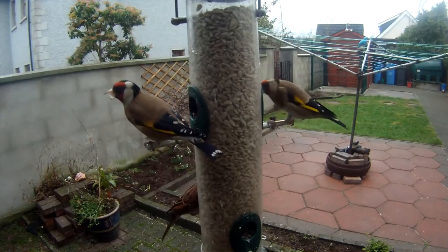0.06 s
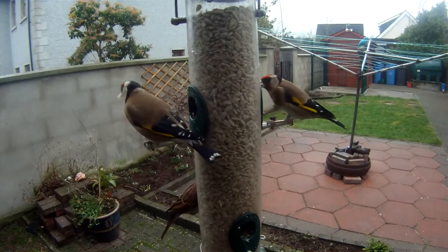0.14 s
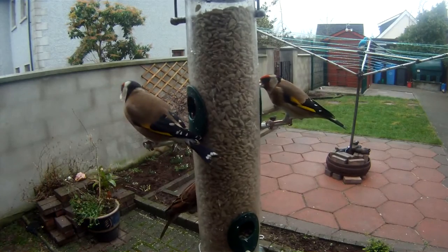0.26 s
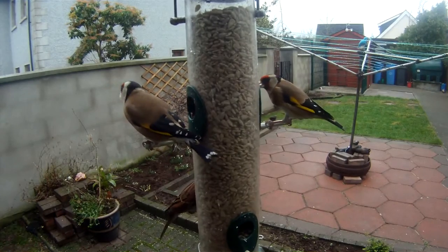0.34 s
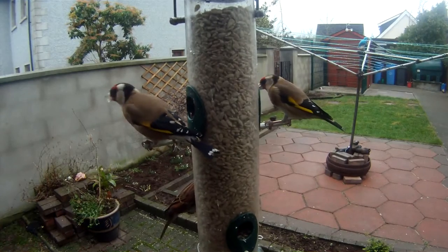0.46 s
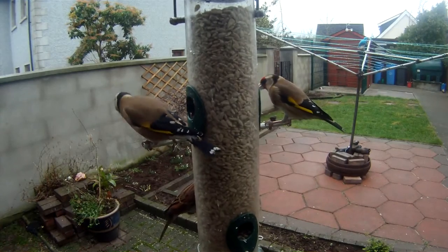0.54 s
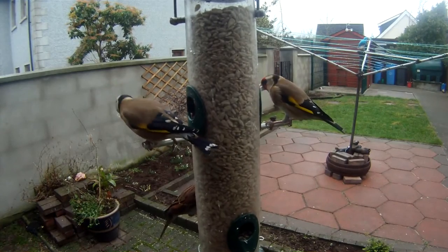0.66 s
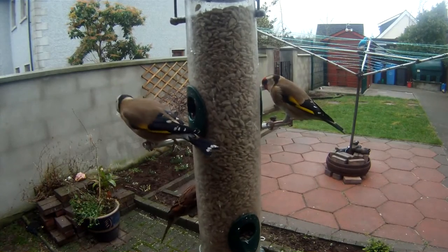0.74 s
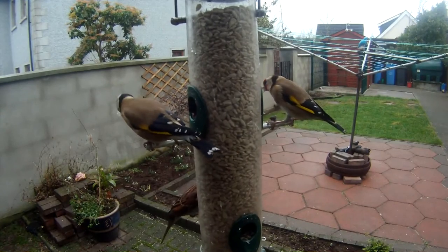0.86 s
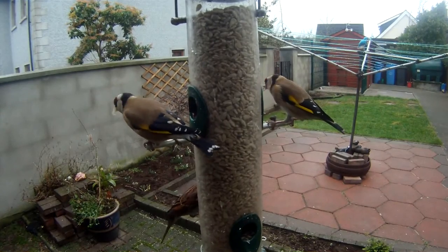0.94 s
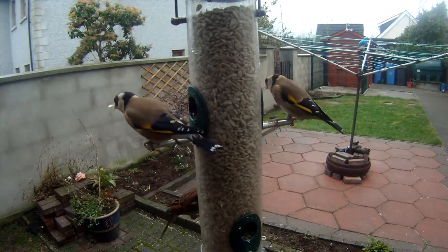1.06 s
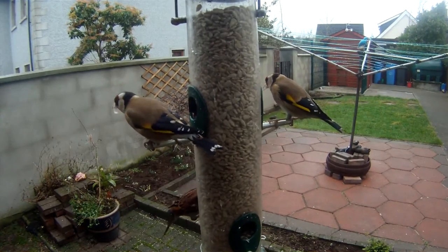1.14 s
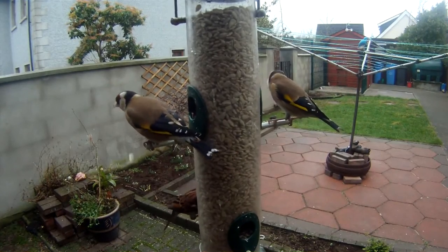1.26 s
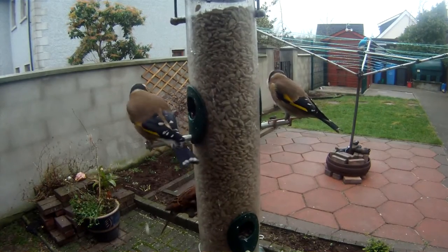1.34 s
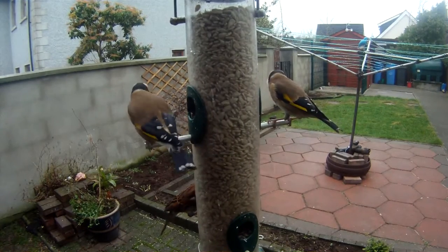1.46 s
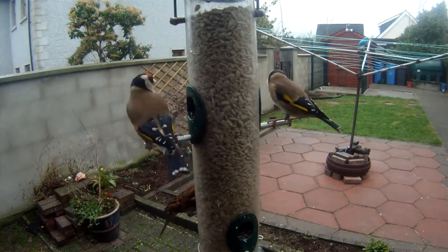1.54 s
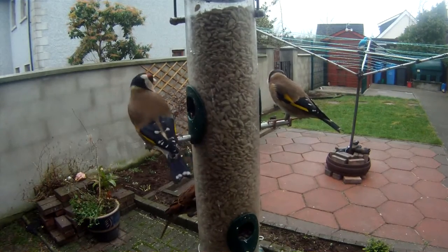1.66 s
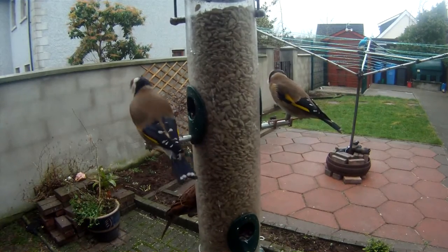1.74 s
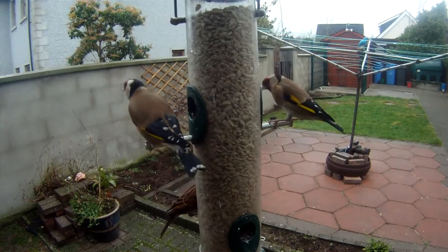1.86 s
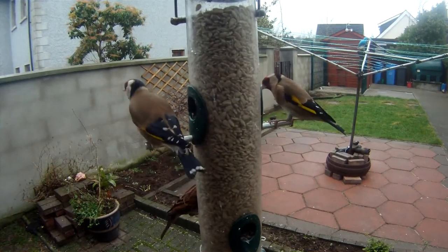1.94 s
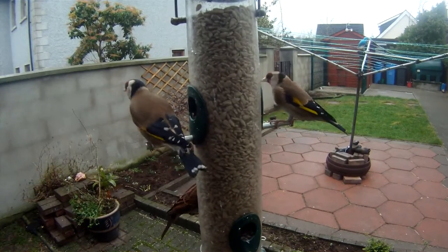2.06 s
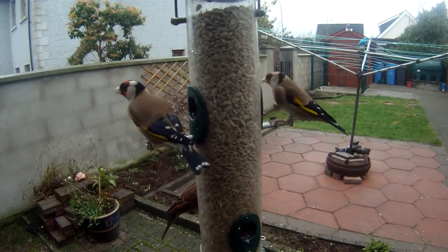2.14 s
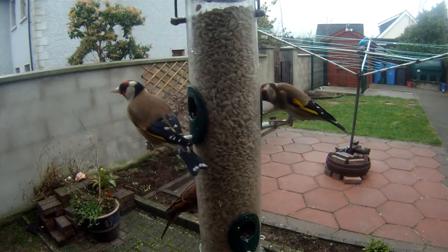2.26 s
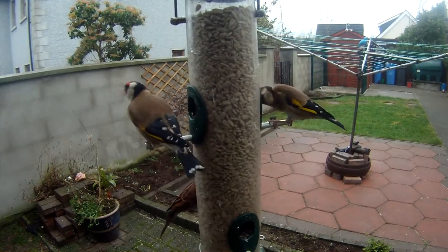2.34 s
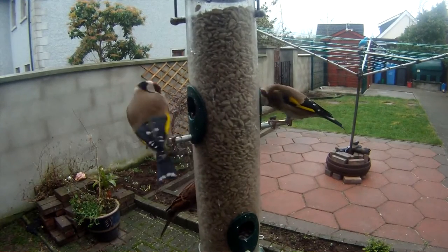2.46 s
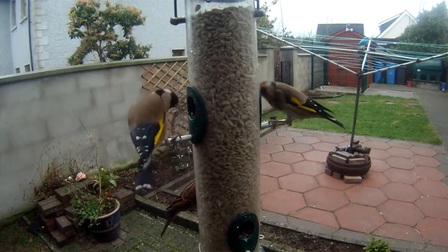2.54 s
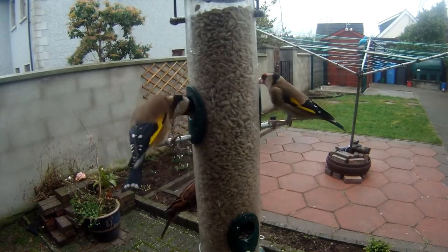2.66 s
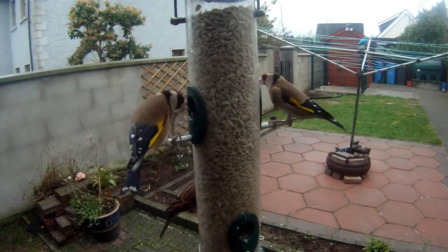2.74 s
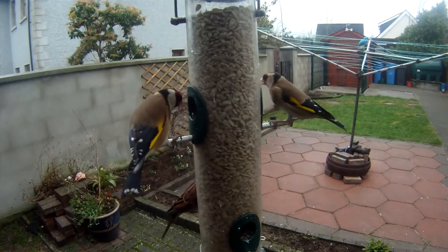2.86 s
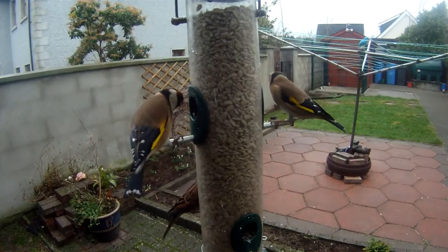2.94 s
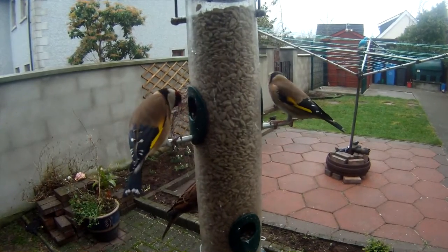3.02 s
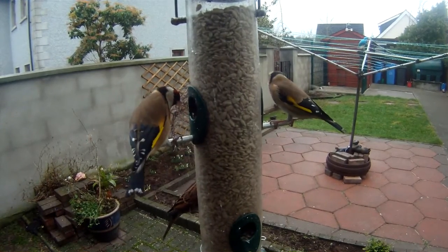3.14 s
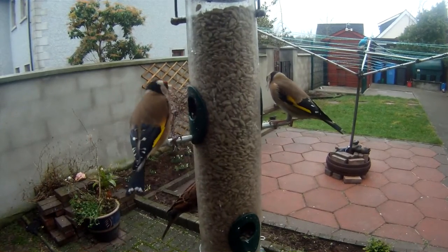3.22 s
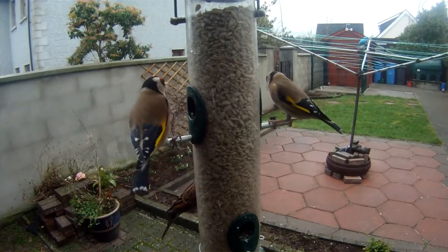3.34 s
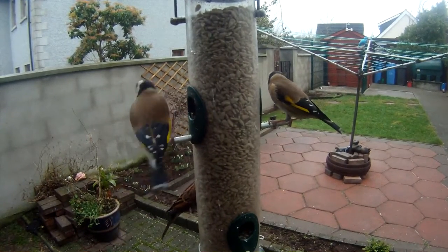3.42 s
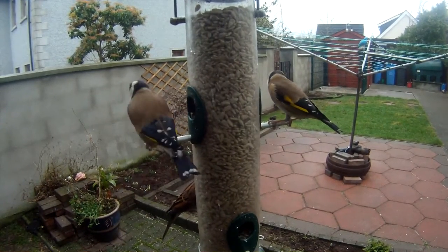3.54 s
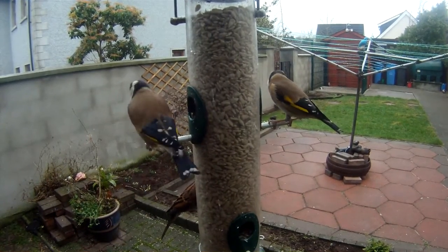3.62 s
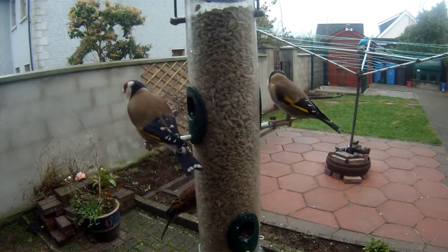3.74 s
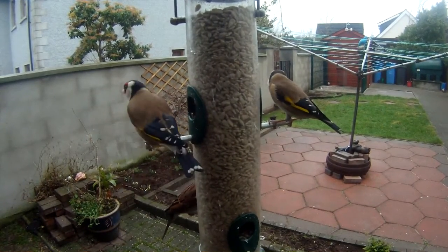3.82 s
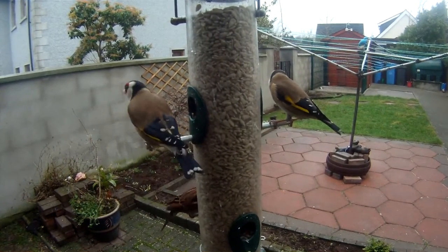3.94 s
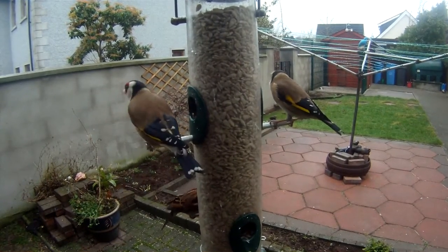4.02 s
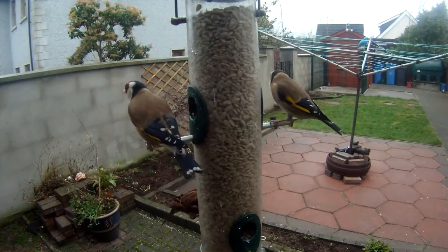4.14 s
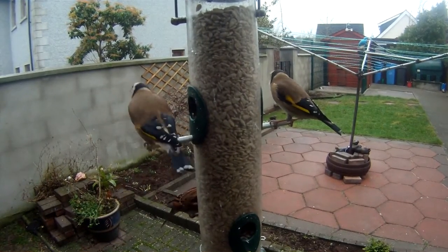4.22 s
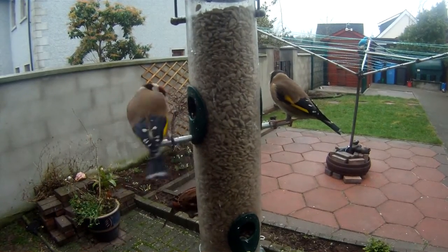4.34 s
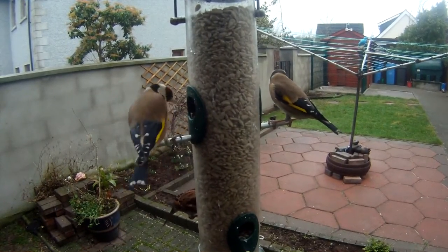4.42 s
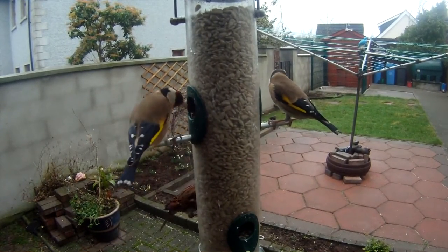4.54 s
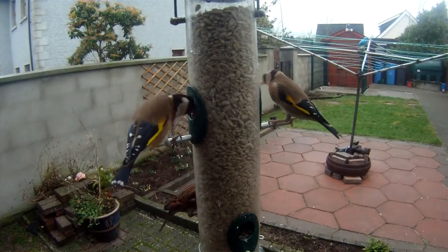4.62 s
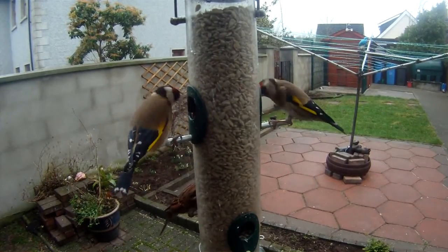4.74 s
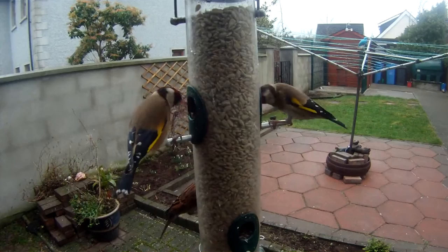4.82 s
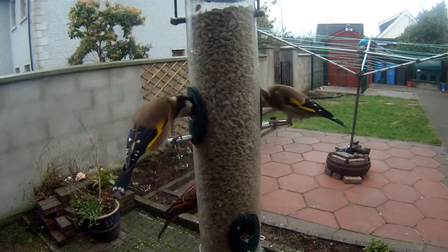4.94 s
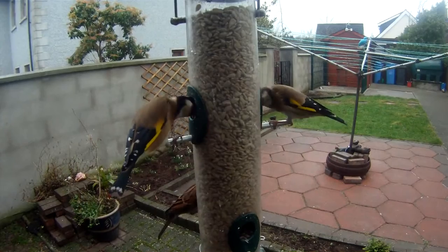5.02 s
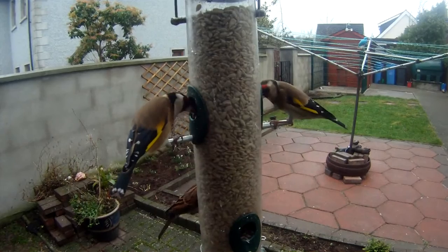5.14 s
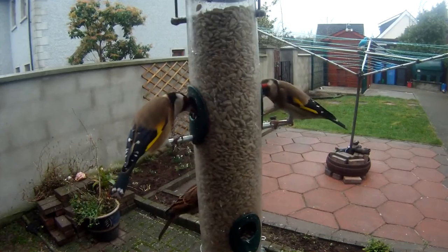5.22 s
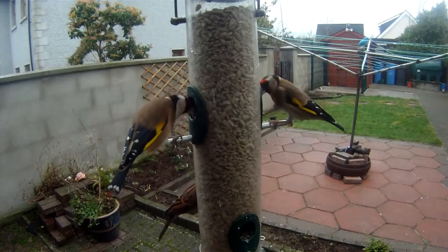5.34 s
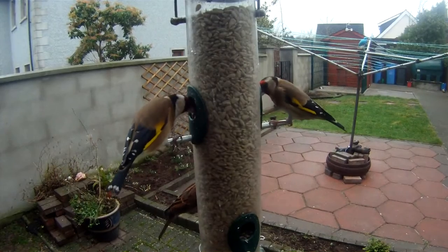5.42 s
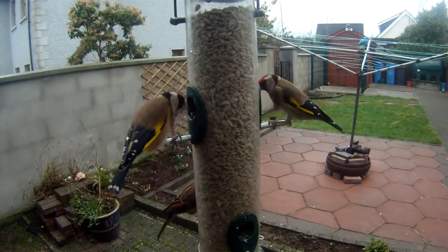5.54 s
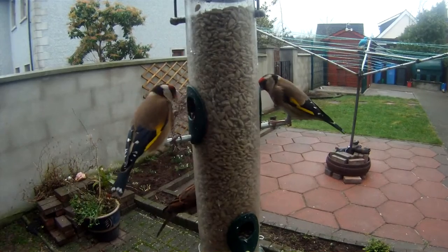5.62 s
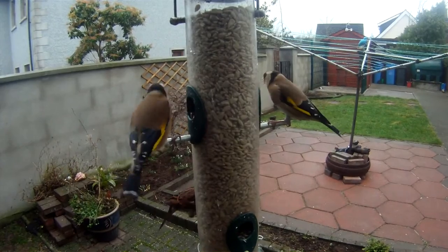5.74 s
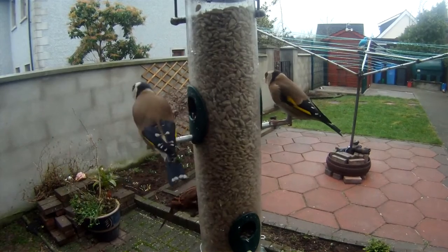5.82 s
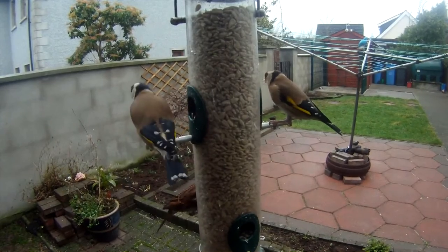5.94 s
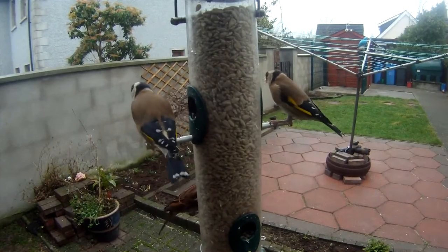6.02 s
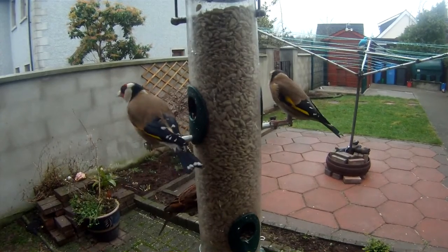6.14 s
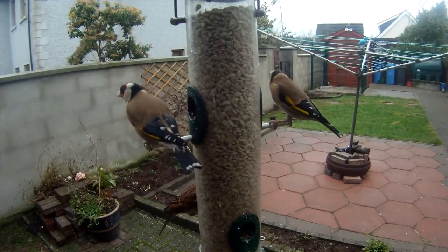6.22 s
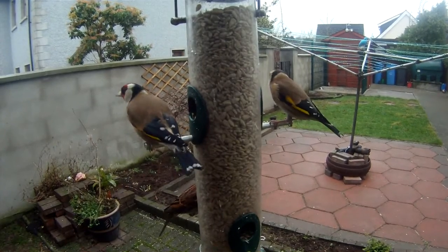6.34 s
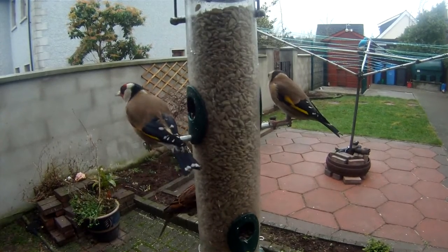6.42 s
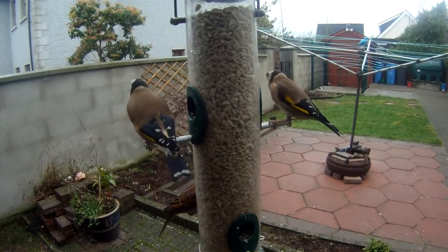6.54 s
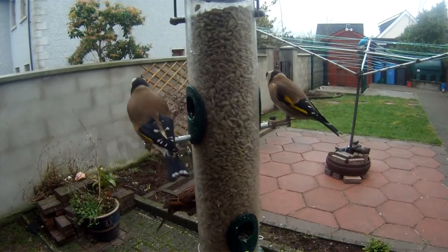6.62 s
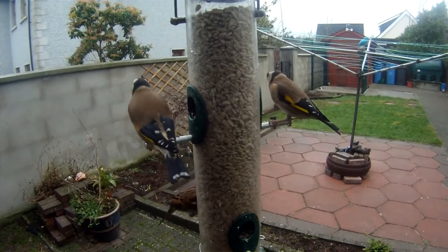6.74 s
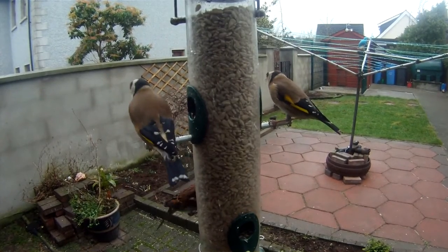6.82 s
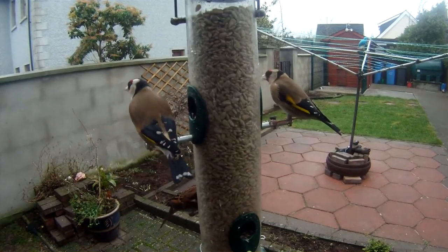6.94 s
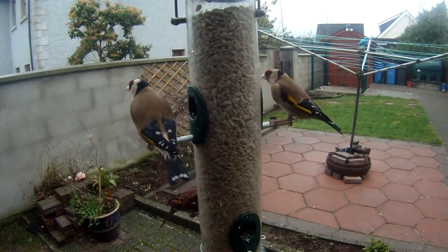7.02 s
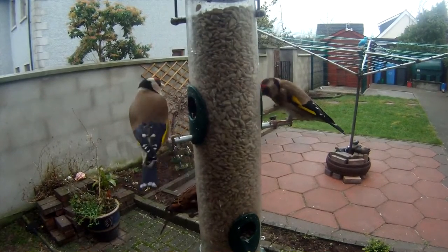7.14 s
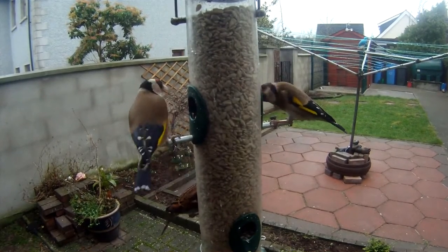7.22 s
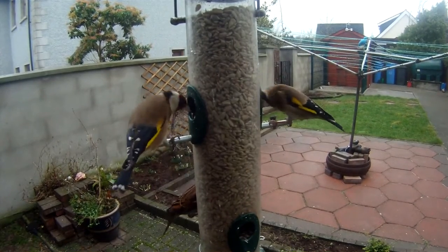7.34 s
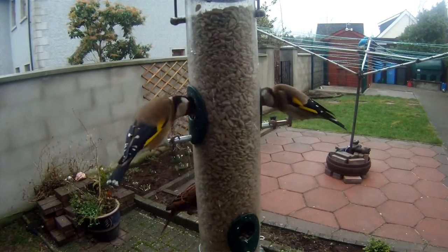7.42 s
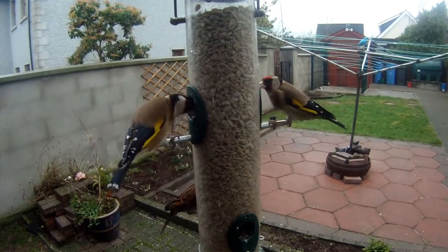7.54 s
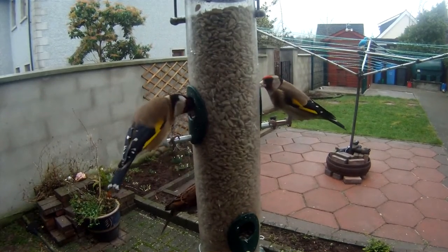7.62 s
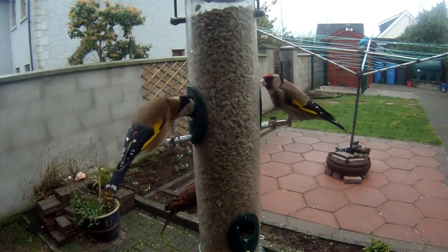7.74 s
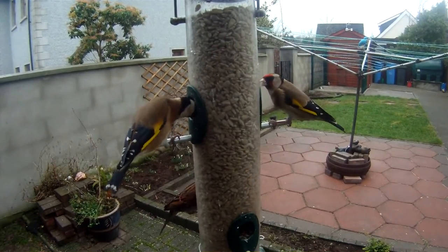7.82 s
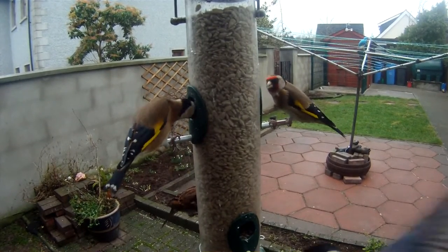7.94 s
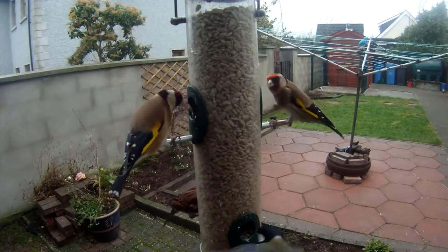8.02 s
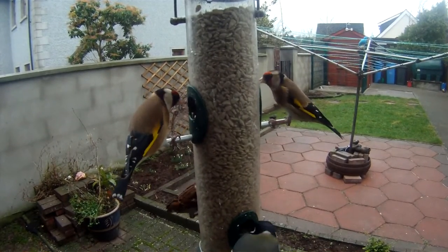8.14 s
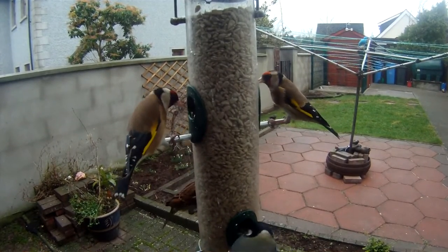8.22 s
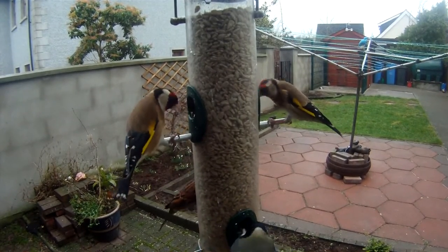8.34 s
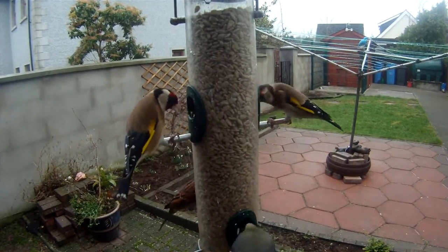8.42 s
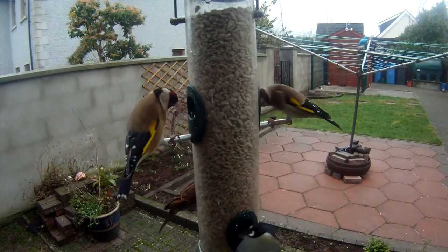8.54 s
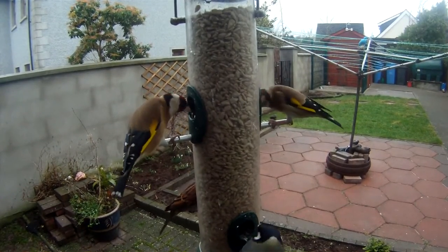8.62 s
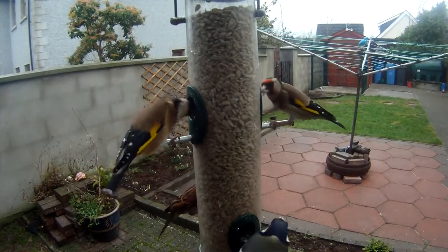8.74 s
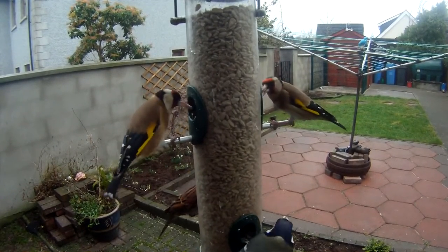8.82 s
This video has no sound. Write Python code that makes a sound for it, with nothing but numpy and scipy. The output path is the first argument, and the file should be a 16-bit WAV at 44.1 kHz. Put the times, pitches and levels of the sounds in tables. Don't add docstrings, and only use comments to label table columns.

```python
import sys
import numpy as np
from scipy import signal
from scipy.io import wavfile

SR = 44100
rng = np.random.default_rng(int(sys.argv[2]) if len(sys.argv) > 2 else 0)


def transcribe(signal):
    frames = np.atleast_2d(signal).T
    limited = np.clip(frames, -1, 1)
    pcm = np.round(limited * 32767).astype(np.int16)
    wavfile.write(sys.argv[1], SR, pcm)


def volts_from_db(level):
    exponent = np.asarray(level, float) / 20
    return 10 ** exponent


N = 391163

# frequency in Hz, level in dB per Hz.
HUM_SPECTRUM = [(59, -30), (100, -4.5), (205, -5.5), (299, -6.5), (420, -6), (543, -3), (791, -12),
                (939, -12), (1600, -17.5), (2170, -18.5), (2490, -21), (3220, -23.5), (4020, -29),
                (5010, -17), (5950, -48), (7740, -71), (13100, -120)]
# time in seconds, level in dB.
TRAFFIC_SWELL = [(0, 1.1), (1.2, 0), (2.8, 0.8), (4.5, 0.63), (6.4, -.3), (6.9, 1.5), (7.5, -.5), (8.1, 1),
                 (8.5, -0.5), (8.87, .6)]
# time in seconds, level in dB.
ENGINE_LEVEL = [(0, -78), (2.9, -61), (3.2, -64), (3.9, -62), (4.3, -74), (4.9, -59), (6.1, -62),
                (6.4, -77), (6.9, -58), (7.9, -55.5), (8.4, -64), (8.87, -64)]
# start in seconds, length in seconds, level in dB.
SWINGS = [(1.05, 0.12, -69), (1.5, 0.17, -59), (2.0, 0.19, -53), (2.6, 0.24, -55.5), (4.167, 0.31, -51.5),
          (4.9, 0.56, -59), (5.606, 0.21, -60), (6.624, 0.12, -44.5), (7.132, .22, -43), (7.374, .1, -56),
          (7.573, 0.2, -45), (8.072, 0.215, -51)]
# start in seconds, length in seconds, middle frequency in Hz, level in dB.
CHIRPS = [(.444, 0.015, 3280, -58), (.514, .017, 3420, -57), (0.605, 0.021, 3250, -55),
          (1.497, 0.021, 3310, -60.5), (2.572, 0.016, 3060, -54.5), (3.115, 0.019, 3150, -58),
          (3.194, .022, 3380, -59.5), (3.735, .021, 3370, -60.5), (3.828, 0.022, 3500, -60),
          (4.745, 0.0193, 3300, -64), (4.825, 0.015, 3430, -57.5), (5.588, 0.022, 2950, -62),
          (7.538, .017, 3500, -64), (8.84, 0.012, 3020, -61.5)]
# start in seconds, length in seconds, start frequency in Hz, droop in Hz, level in dB.
WHISTLES = [(.165, .057, 5300, 220, -72), (.455, .06, 5300, 250, -75), (.715, .085, 5350, 400, -74),
            (4.076, .08, 5400, 900, -72), (4.355, .07, 5400, 700, -71), (4.618, .085, 5380, 700, -71),
            (4.902, .095, 5380, 700, -73), (8.19, .045, 5250, 100, -73), (8.253, .029, 3140, 400, -58.5),
            (8.419, .1, 5320, 120, -75), (8.691, .045, 4950, 120, -72)]
# start in seconds, pitch factor, level in dB.
CALLS = [
    (2.668, 1.001, -57),
    (7.027, 1.025, -60),
]
# delay in seconds, length in seconds, start, middle and end frequency in Hz,
# level in dB.
CALL_NOTES = [
    (0, .055, 4250, 5000, 5580, -4),
    (.04, 0.014, 2900, 3600, 4320, -1),
    (0.044, .07, 4330, 4230, 2940, 2.2),
]
# start in seconds, length in seconds, start and end frequency in Hz, level in dB.
PEEPS = [(2.138, 0.0146, 2780, 3270, -54), (4.2, .07, 4500, 5100, -76), (.775, 0.039, 2030, 2060, -65.5),
         (1.314, .06, 4670, 3950, -74), (1.349, .018, 3580, 3500, -67.5), (1.375, .025, 3180, 3080, -69),
         (4.7, .03, 4530, 4320, -73), (7.5, .046, 2780, 2840, -70), (8.188, .035, 4500, 4730, -73),
         (8.31, .025, 4600, 4700, -73)]
# frequency in Hz, level in dB, t60 in seconds.
BODY_MODES = [(482, 9, 0.044), (597, 9, 0.028), (990, 7, 0.015), (319, -6.5, 0.051)]
WALL_MODES = [(1146, -9.5, 0.021), (1307, -9, 0.028), (1493, -12.5, 0.036), (1666, -2, 0.024),
              (1957, 3, 0.018), (2267, -2, 0.012)]
PERCH_MODES = [(2560, -10, .012), (2830, -4, .017), (3150, 1.5, .017), (3430, -8, .012)]
TICK_MODES = [(3850, 3.5, 0.0072), (4380, 3.5, 0.0066), (4500, 17, 0.001), (5050, -24, 0.0039)]
FAMILY_BANDS = [(250, 1100), (850, 2500), (2300, 3700), (3400, 5000)]
# start in seconds, length in seconds, level in dB.
RUSTLES = [(2.015, 0.12, -61), (2.13, 0.062, -68), (4.22, 0.16, -64), (4.47, 0.061, -58),
           (5.068, 0.22, -64), (5.258, 0.093, -55.5), (5.748, 0.12, -66), (6.696, 0.054, -50),
           (6.765, 0.07, -64), (6.833, 0.019, -68), (7.07, 0.028, -55), (7.15, 0.16, -59.5),
           (7.35, 0.028, -58), (7.842, 0.072, -58), (8.06, 0.03, -74), (5.99, 0.12, -68),
           (3.218, .03, -59.5), (3.583, 0.048, -68), (7.701, 0.022, -59), (8.128, 0.12, -64),
           (8.517, 0.057, -57)]
# time in seconds, length in ms, force in dB, lean from wall towards perch in dB,
# shove into the hollow body in dB.
PECKS = [(2.6434, 12, -19, -2, -14.5), (2.756, 3.5, -26.5, 11.5, -22), (2.8697, 17, -43.5, -1, -3),
         (2.8963, 9.2, -36.5, 3.5, -5.5), (4.5424, 15, -26.5, 2.5, -11.5), (4.5518, 2.3, -33.5, -2, -30),
         (5.2521, 6.7, -27, 6, -37), (5.2641, 4.3, -27, 4.5, -38), (5.2798, 13, -31, 3, -6.5),
         (5.2917, 6.9, -35, 0.5, -5.5), (6.6586, 6.2, -25, -8, -9), (6.682, 5.8, -22.5, 4, -12),
         (6.6872, 4.6, -20, -7, -10), (6.7113, 9.7, -28, -4, -18), (6.8465, 2.3, -20.5, -10, -10.5),
         (6.8557, 4.2, -23.5, -3.5, -15), (7.0168, 2.5, -35.5, 3, -7.5), (7.0681, 26, -19.5, -12, -19.5),
         (7.078, 2.5, -21.5, -6.5, -23), (7.318, 10.3, -24, -3, -14.5), (7.5589, 5, -32, -6, -12),
         (7.9862, 3.2, -32.5, 2.5, -22), (8.0357, 1.3, -28.5, 7, -11.5), (8.586, 6.1, -34, -5, -20)]
# time in seconds, level in dB.
NIBBLES = [(2.7275, -47), (2.7444, -45), (4.3244, -46), (4.4819, -51), (4.5025, -56), (4.7787, -48),
           (5.1906, -50), (5.416, -54), (5.8262, -54), (6.164, -51.5), (6.7293, -48), (6.7411, -53),
           (6.749, -37.5), (6.7544, -43), (7.0273, -47), (7.0475, -43), (7.3722, -47), (7.859, -48),
           (7.8796, -44), (7.8996, -46.5), (7.9107, -44), (7.9194, -41.5), (8.5332, -53), (8.5468, -41)]
STEPS = [(2.141, -54), (2.931, -49.5), (4.526, -36), (4.5614, -40), (5.2193, -46), (5.3197, -36.5),
         (5.8136, -48), (5.833, -47), (5.8478, -43), (6.612, -47), (6.6357, -53), (7.0388, -35),
         (7.888, -37), (7.9565, -47.5)]
HUSKS = [(4.5281, -50), (6.6034, -53), (6.7114, -37.5), (7.0174, -47), (7.0395, -55), (7.1951, -55),
         (7.2365, -54), (7.2778, -64), (7.8872, -44.5), (8.0308, -50), (4.31, -50), (2.051, -58)]
THUDS = [(2.7449, -51), (4.5634, -39), (5.4163, -53), (6.8779, -45), (8.0308, -38), (8.0601, -44)]
# length in ms, body, wall, perch and tick level in dB.
LIGHT_COLOURS = [
    (7.3, -8, 2.1, -6, -18),
    (6.1, -31, -5, -0.4, -38),
    (2, -6, -16, -29, 2),
    (16, -4.2, -45, -5, -25),
]
# time in seconds, level in dB.
PORT_FLEXES = [
    (2.648, -36),
    (6.851, -29),
    (7.072, -32),
    (7.325, -33),
]
# frequency in Hz, level in dB, t60 in seconds.
PORT_MODES = [(1188, -2.5, 0.037), (1340, -2, 0.036), (1540, -1, .025)]
# start in seconds, contact in seconds, level in dB, signed direction.
BUMPS = [
    (6.611, 0.017, -32.5, 0.94),
    (8.028, 0.0057, -16.5, -0.53),
    (8.035, 0.00794, -6, 0.63),
    (8.079, 0.019, -27.5, 0.91),
]
# frequency in Hz, sharpness Q.
MOUNT_SPRING = (29, 1.46)
# frequency in Hz, level in dB, t60 in seconds.
BRACKET_MODES = [(248, -27.5, 0.073), (303, -41, 0.09), (2800, -27, 0.0062), (3500, -24.5, 0.0063),
                 (4900, -25, 0.0092)]


def rms_one(x):
    return x / np.sqrt(np.mean(x ** 2) + 1e-20)


def level_curve(rows):
    s, db = np.transpose(rows)
    return np.interp(np.arange(N) / SR, s, db)


def drift(rate_hz):
    r = np.exp(-80 * np.pi * rate_hz / SR)
    slow = signal.lfilter([1], [1, -2 * r, r * r], rng.standard_normal(N // 40 + 2002))[2000:]
    return np.interp(np.arange(N) / 40, np.arange(len(slow)), rms_one(slow))


def ring(push, hz, t60_s):
    r, w = volts_from_db(-60 / (t60_s * SR)), 2 * np.pi * hz / SR
    return signal.lfilter([0, np.sin(w)], [1, -2 * r * np.cos(w), r * r], push + 1e-18)


def band_pass(x, low_hz, high_hz, order=3):
    return signal.sosfilt(signal.butter(order, [low_hz, high_hz], "band", fs=SR, output="sos"), x)


def noise_band(low_hz, high_hz):
    return rms_one(band_pass(rng.standard_normal(N + SR), low_hz, high_hz)[SR:])


def hum():
    dull_db, airy_db, patchy_db, shared = -56, -63.5, 1.1, 0.35
    hz, level_db = np.transpose(HUM_SPECTRUM)
    white, together = rng.standard_normal((2, N)), drift(0.79)
    dull, airy = np.zeros((2, N))
    edges_hz = 130 * 2 ** (np.arange(17) / 2.9)
    for k, (low, high) in enumerate(zip(edges_hz, edges_hz[1:])):
        band = band_pass(white[k % 2], low, high, order=2)
        db = np.interp(np.log(low * high) / 2, np.log(hz), level_db)
        db = db + patchy_db * (shared * together + drift(7.8))
        part = airy if low > 900 else dull
        part += volts_from_db(db) * band
    return volts_from_db(level_curve(TRAFFIC_SWELL)) * (volts_from_db(dull_db) * rms_one(dull) + volts_from_db(airy_db) * rms_one(airy))


def engine():
    return volts_from_db(level_curve(ENGINE_LEVEL)) * noise_band(36.2, 53)


def swing_envelope():
    out = np.zeros(N)
    for s, length_s, level_db in SWINGS:
        i, n = int(s * SR), int(length_s * SR)
        out[i:i + n] += volts_from_db(level_db) * np.hanning(n)
    return out


def sway():
    rest_db, buffet_db, swing_buffet_db, gusty_db = -62.5, -61, -11, 0.8
    swing = swing_envelope()
    rocking = volts_from_db(rest_db + gusty_db * drift(0.99)) * noise_band(36.6, 60.8)
    rocking += volts_from_db(rest_db - 12) * noise_band(14, 33)
    rocking += swing * noise_band(14.5, 60)
    buffet = volts_from_db(buffet_db + gusty_db * drift(1.03)) + volts_from_db(swing_buffet_db) * swing
    return rocking + buffet * noise_band(61.5, 131.7)


def bird_notes():
    fall_hz_per_s, chirp_early, droop_early = 52500, 0.555, 0.219
    rows = []
    for s, length_s, hz, db in CHIRPS:
        fall_hz = fall_hz_per_s * length_s
        rows.append((s, length_s, hz + chirp_early * fall_hz, hz, hz - (1 - chirp_early) * fall_hz, db))
    for s, length_s, hz, droop_hz, db in WHISTLES:
        rows.append((s, length_s, hz, hz - droop_early * droop_hz, hz - droop_hz, db))
    for s, pitch, db in CALLS:
        for delay_s, length_s, *hz, rel_db in CALL_NOTES:
            rows.append((s + delay_s, length_s, *(pitch * np.array(hz)), db + rel_db))
    for s, length_s, start_hz, end_hz, db in PEEPS:
        rows.append((s, length_s, start_hz, (start_hz + end_hz) / 2, end_hz, db))
    return rows


def garden_echoes(voice):
    t60_s, blur_db, slap_s = 0.35, -5.5, 0.012
    t = np.arange(SR // 2) / SR
    decay = volts_from_db(-60 * t / t60_s) + 1.5 * volts_from_db(-60 * t / 0.05)
    blur = rng.standard_normal(len(t)) * decay * (t > 0.005)
    blur *= volts_from_db(blur_db) / np.sqrt(np.sum(blur ** 2))
    blur[0] = 1
    blur[int(slap_s * SR)] += 0.4
    return signal.fftconvolve(voice, blur)[:N]


def birds():
    roughness, waver_hz = 0.38, 30
    out, waver = np.zeros(N + SR), waver_hz * drift(98)
    for s, length_s, start_hz, middle_hz, end_hz, level_db in bird_notes():
        u = np.linspace(0, 1, int(length_s * SR))
        i = int(s * SR)
        hz = np.polyval(np.polyfit([0, 0.5, 1], [start_hz, middle_hz, end_hz], 2), u)
        hz += waver[i:i + len(u)]
        swell = np.abs(np.sin(np.pi * u ** 1.02)) ** 0.49
        out[i:i + len(u)] += volts_from_db(level_db) * np.sqrt(2) * swell * np.sin(2 * np.pi * np.cumsum(hz) / SR)
    return garden_echoes(out[:N] * (1 + roughness * drift(170)))


def rustle_shower():
    shower = np.zeros(N)
    for s, length_s, level_db in RUSTLES:
        i, n = int(s * SR), int(length_s * SR)
        shower[i:i + n] += volts_from_db(level_db) * np.hanning(n) ** 0.28
    return shower * volts_from_db(3.5 * drift(46.0))


def contacts():
    s, ms, force_db, lean_db, shove_db = np.transpose(PECKS)
    tick_db = force_db - 25 + 0.49 * (force_db + 37)
    wall_db = force_db - np.maximum(lean_db, 0)
    perch_db = force_db + np.minimum(lean_db, 0)
    rows = list(np.transpose([s, ms, force_db + shove_db, wall_db, perch_db, tick_db]))
    for kind, (length_ms, *colour_db) in zip((NIBBLES, STEPS, HUSKS, THUDS), LIGHT_COLOURS):
        for time_s, db in kind:
            rows.append((time_s, length_ms, *(db + np.array(colour_db))))
    return np.vstack(rows)


def taps():
    density, rise_s, shove_s, body_lag_s = 0.15, 0.00044, 0.00037, 0.00418
    gain_db, grains_per_s, strike = -3, 2500, 0.55
    rows, out = contacts(), np.zeros((4, N))
    span = np.arange(900)
    u = span / (rows[:, 1:2] * SR / 1000)
    rub = rng.standard_normal(u.shape) * (rng.random(u.shape) < density)
    rub *= np.exp(-1.6 * u ** 1.32)
    rub *= 1 - np.exp(-span / SR / rise_s)
    rub /= np.sqrt(np.sum(rub ** 2, axis=1, keepdims=True))
    loud = np.clip((np.max(rows[:, 3:5], axis=1) + 34) / 12, 0, 1)
    rub[:, 4] += strike * loud
    thump = np.abs(rub) * np.exp(-span / SR / shove_s)
    thump /= np.sum(thump, axis=1, keepdims=True) + 1e-9
    at = np.round(rows[:, :1] * SR).astype(int) + span
    luck = rng.standard_normal((len(rows), 18))
    shower = rustle_shower()
    grains = rng.standard_normal(N) * (rng.random(N) < grains_per_s / SR)
    families = (BODY_MODES, WALL_MODES, PERCH_MODES, TICK_MODES)
    modes = [(family, mode) for family, group in enumerate(families) for mode in group]
    for k, (family, (hz, level_db, t60_s)) in enumerate(modes):
        strength = volts_from_db(rows[:, 2 + family] + gain_db + 2 * luck[:, k])
        lag = int(body_lag_s * SR) * (family == 0)
        drive = thump if family == 0 else rub
        push = np.zeros(N + 2000)
        np.add.at(push, at + lag, drive * strength[:, None])
        grit = shower * np.roll(grains, k * N // 19) * volts_from_db(-8.5 - 6.7 * abs(family - 1.4))
        out[family] += (-1) ** k * volts_from_db(level_db) * ring(push[:N] + grit, hz, t60_s)
    return sum(band_pass(part, *edges_hz) for edges_hz, part in zip(FAMILY_BANDS, out))


def port():
    s, db = np.transpose(PORT_FLEXES)
    push = np.zeros(N)
    push[(s * SR).astype(int)] = volts_from_db(db)
    push = band_pass(push + 1e-18, 900, 1900, order=2)
    out = np.zeros(N)
    for k, (hz, level_db, t60_s) in enumerate(PORT_MODES):
        out += (-1) ** k * volts_from_db(level_db) * ring(push, hz, t60_s)
    return out


def landings():
    push = np.zeros(N)
    for s, contact_s, level_db, direction in BUMPS:
        u = np.linspace(0, 1, int(contact_s * SR))
        i = int(s * SR)
        push[i:i + len(u)] += direction * volts_from_db(level_db) * np.abs(np.sin(np.pi * u ** 1.4)) ** 0.55
    push = signal.sosfilt(signal.butter(2, 220, fs=SR, output="sos"), push)
    mount_hz, q = MOUNT_SPRING
    w = 2 * np.pi * mount_hz
    out = signal.lfilter(*signal.bilinear([1, 0, 0], [1, w / q, w * w], SR), push)
    claws = np.zeros(N)
    grip = int((BUMPS[2][0] + 0.0012) * SR)
    claws[grip + np.array([0, 37, 95, 160])] = [-0.36, -1.4, 0.024, -0.17]
    for hz, level_db, t60_s in BRACKET_MODES:
        out += volts_from_db(level_db) * ring(claws, hz, t60_s)
    return out


def scene():
    feeder = taps() + port()
    mono = feeder + birds() + sway() + landings() + engine() + hum()
    return np.tile(mono, (2, 1))


def band_limit(x):
    return signal.sosfilt(signal.butter(12, 16480, fs=SR, output="sos"), x)


def record(dry):
    hiss_db = -80.5
    guarded = signal.sosfilt(signal.butter(6, 5500, fs=SR, output="sos"), dry[0])
    coarse = signal.resample_poly(guarded, 40, 147)
    held = signal.resample_poly(np.repeat(coarse, 4), 147, 160)[:N]
    held = signal.sosfilt(signal.cheby2(8, 22, 15650, fs=SR, output="sos"), held)
    held = signal.sosfilt(signal.cheby2(10, 60, 17000, fs=SR, output="sos"), held)
    side = volts_from_db(hiss_db) * (noise_band(910, 7100) + volts_from_db(-12.5) * noise_band(110, 760))
    return band_limit(np.array([held + side, held - side]))


dry = scene()
out = record(dry)
transcribe(out)
```